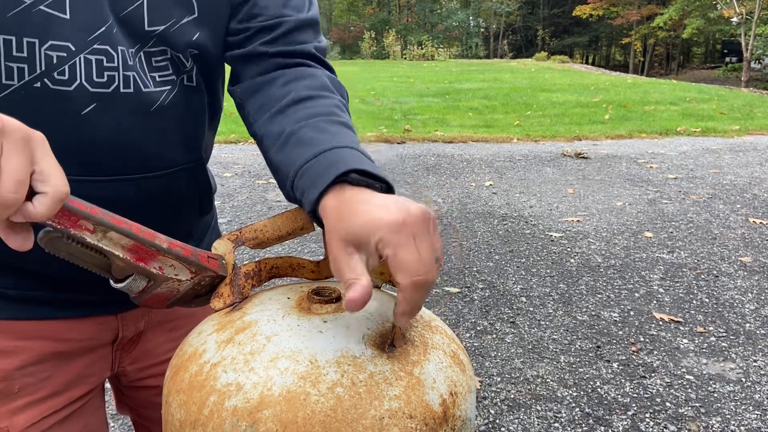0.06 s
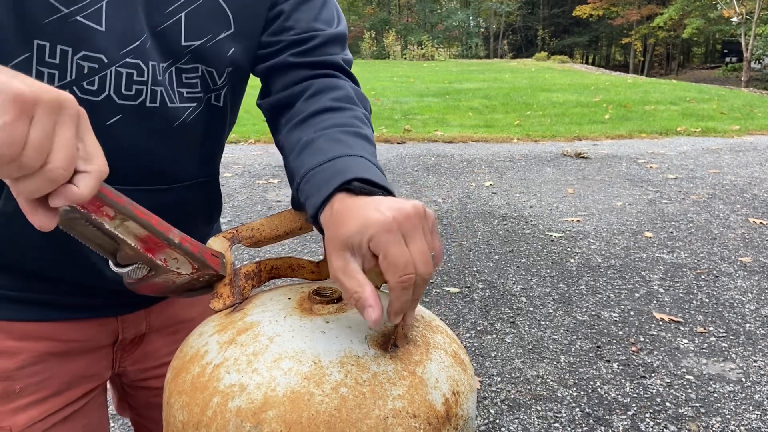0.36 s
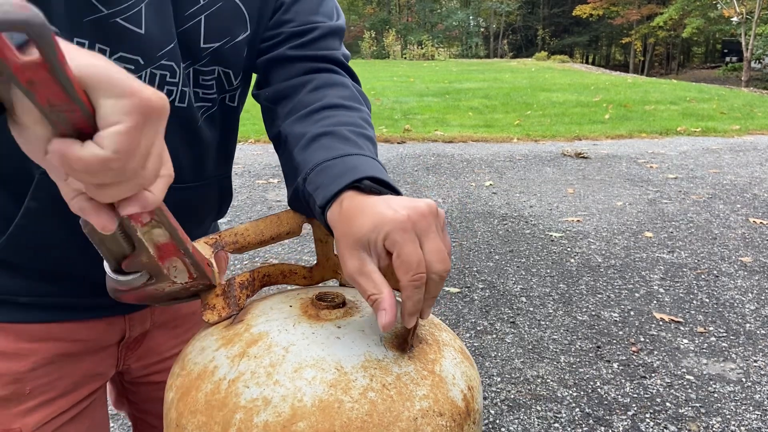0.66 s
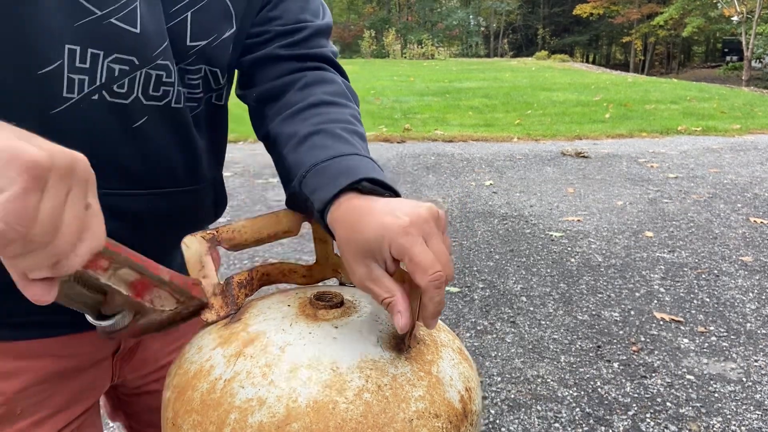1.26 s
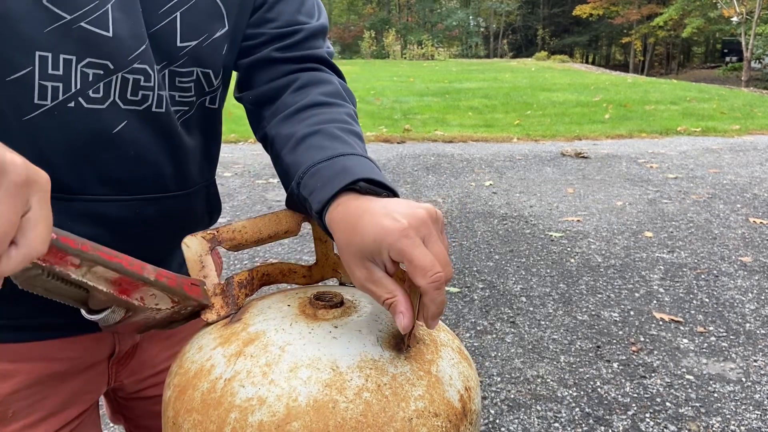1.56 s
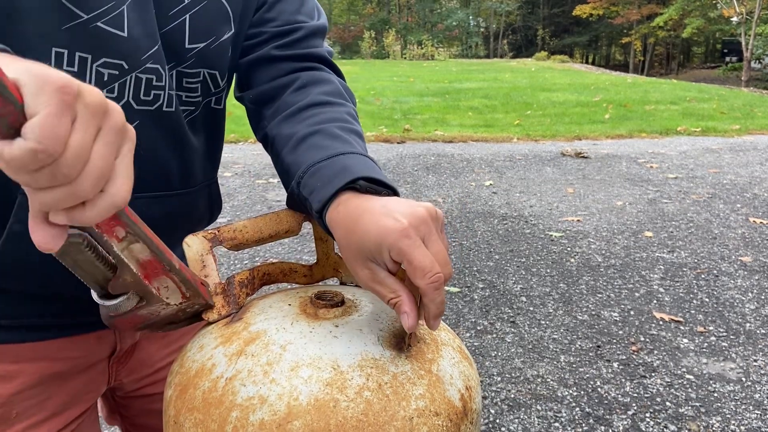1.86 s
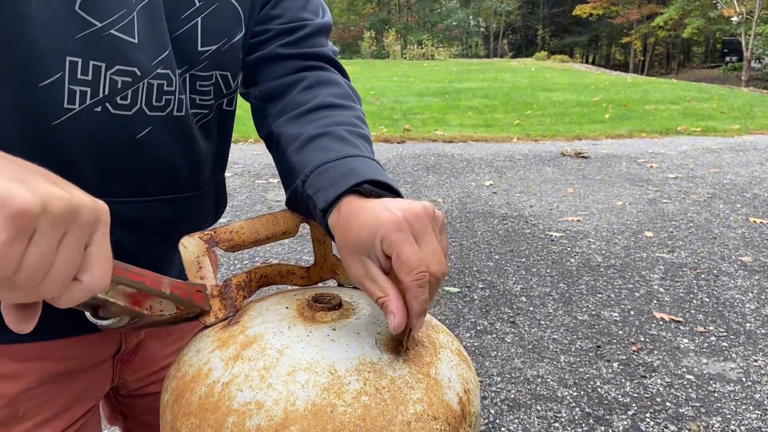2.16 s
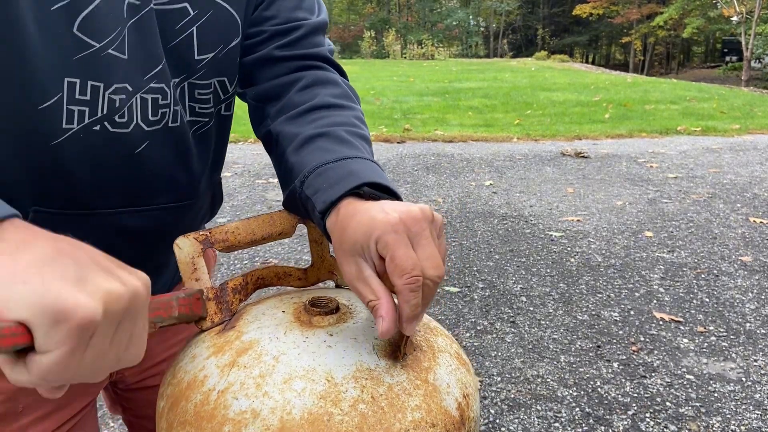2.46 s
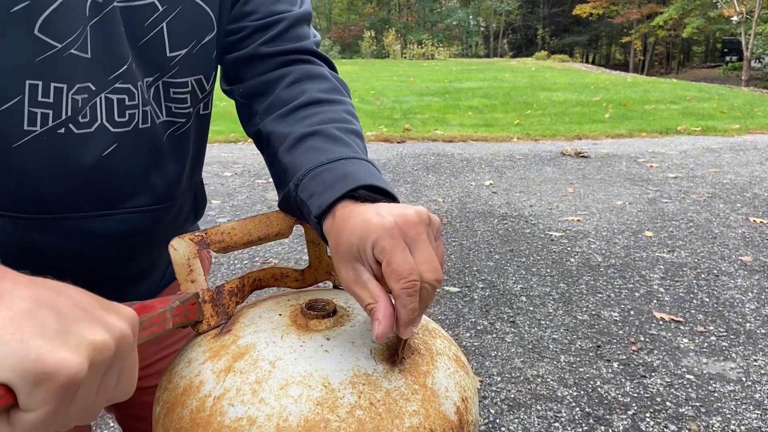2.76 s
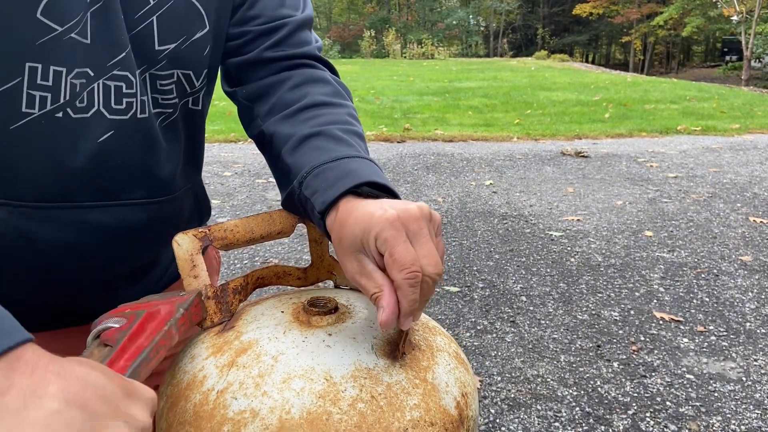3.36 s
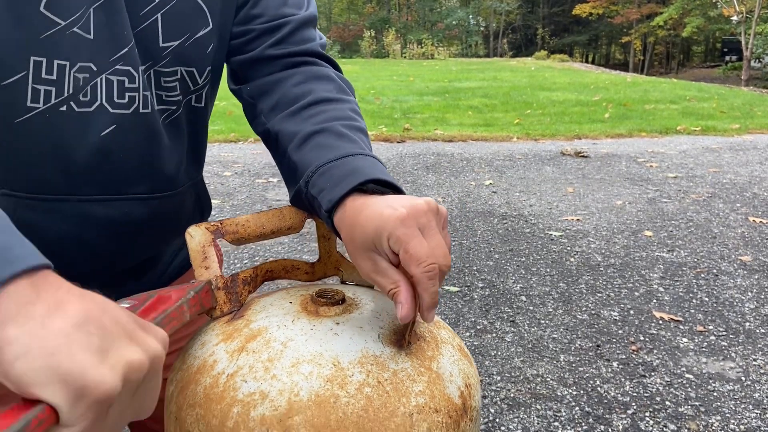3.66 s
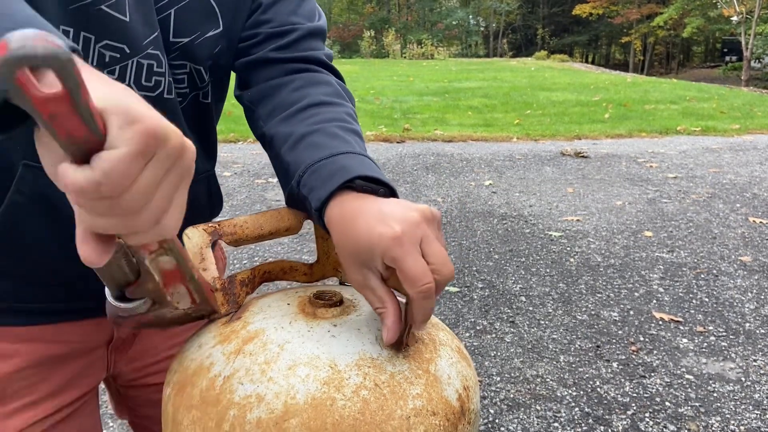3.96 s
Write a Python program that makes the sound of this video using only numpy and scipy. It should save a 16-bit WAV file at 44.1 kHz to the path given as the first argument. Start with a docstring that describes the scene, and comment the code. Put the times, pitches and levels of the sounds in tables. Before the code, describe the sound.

One loud, ringing clang of a tool striking a metal tank, following faint rattles and wind.

```python
"""A steel hand tool on a rusty gas tank, close to a stereo microphone on a quiet driveway.
The tool knocks, rattles and scrapes against the handle, then hits the tank hard: the blow chatters
for a few milliseconds and the shell rings on in beating pairs of modes. Fingers tap, grit clicks and
a sleeve rustles. Wind buffets the microphone, and the recorder's gain ducks under the clang."""
import sys
import numpy as np
from scipy import signal
from scipy.fft import rfft, irfft
from scipy.io import wavfile
from scipy.ndimage import uniform_filter1d, minimum_filter1d

SR = 44100
rng = np.random.default_rng(int(sys.argv[2]) if len(sys.argv) > 2 else 0)


def dump(signal):
    """Clip the signal to [-1, 1] and save it as 16-bit WAV at the path in sys.argv[1]."""
    limited = np.clip(np.atleast_2d(signal).T, -1, 1)
    pcm = np.round(limited * 32767).astype(np.int16)
    wavfile.write(sys.argv[1], SR, pcm)


N = 176400
T = np.arange(N) / SR

# Levels in the tables are relative; each source adds its own gain.
# dense, quickly damped ringing of tool and handle: freq_hz, density_db
CLANK_SPECTRUM = [(60, -9), (330, -28), (520, -1.5), (700, 2), (860, -16), (1130, -20), (1400, 2.5),
                  (2100, -4.5), (2900, 6.5), (3500, -4.5), (4200, -8), (6500, -12.5), (8000, -5.5),
                  (10000, -5), (11500, -9.5), (15000, -16)]
# the many weak upper modes of the shell: freq_hz, density_db
SHIMMER_SPECTRUM = [(200, -13), (600, 5), (950, -19), (1500, -8), (2300, -12), (3600, 2), (5100, -6.5),
                    (6200, -6.5), (8000, -1.5), (10300, -10.5), (12000, -7), (15000, -29)]
# steel catching on rust: freq_hz, density_db
RASP_SPECTRUM = [(100, -46), (450, -10), (720, 11.5), (1000, -4), (1450, 1.5), (1800, -8), (2300, 5),
                 (2900, -2.5), (3600, 0), (4800, -11.5), (7000, -4.5), (9500, -9.5), (11500, -3),
                 (14500, -4.5)]
# stereo width of the close sounds: freq_hz, side_minus_mid_db
CLOSE_WIDTH = [(100, -8), (700, -14), (1400, -14), (2400, -8), (4400, -9), (8500, -13), (15000, -14)]
# stereo width of wind on the microphone: freq_hz, side_minus_mid_db
WIND_WIDTH = [(30, -22), (60, -46), (125, -5.5), (250, -5.5), (1000, -1.5)]


def undb(db):
    """Decibels to gain."""
    return 10 ** (np.asarray(db) / 20)


def gains(points):
    """Gain of each frequency bin from (freq_hz, level_db) points."""
    hz, db = np.array(points, float).T
    bin_hz = np.arange(N // 2 + 1) * SR / N
    return undb(np.interp(np.log(bin_hz + 1), np.log(hz), db))


def noise(spectrum, width_points):
    """Coloured stereo noise of rms 1."""
    mid, side = rfft(rng.standard_normal((2, N)))
    width = gains(width_points)
    stereo = np.array([mid + width * side, mid - width * side]) / np.hypot(1, width)
    y = irfft(gains(spectrum) * stereo, N)
    return y / y.std()


def pan(db):
    """Channel gains, with the left db above the right."""
    return undb(np.array([[db], [-db]]) / 2)


def walk(rate_hz):
    """Smooth random wander of spread 1."""
    span = max(int(SR / rate_hz), 1)
    y = uniform_filter1d(uniform_filter1d(rng.standard_normal(N), span), span)
    return y / y.std()


def fade(t60_s):
    """Exponential decay, 60 dB down after t60_s."""
    return np.exp(-np.minimum(np.log(1000) * T / t60_s, np.log(1e15)))


def dull(x, hz):
    """Gentle low-pass."""
    return signal.sosfilt(signal.butter(2, hz, fs=SR, output="sos"), x + 1e-18)


def at(x, start_s):
    """The sound x, starting at start_s."""
    delay = int(start_s * SR)
    return np.pad(x[:, :N - delay], ((0, 0), (delay, 0)))


def modes(table):
    """Ring of a small part after a sharp contact."""
    return sum(undb(db) * np.sin(2 * np.pi * hz * T) * fade(t60) for hz, db, t60 in table)


def bursts(spectrum, t60_s, count):
    """Short decaying bursts of coloured stereo noise, each one different."""
    size = N // 16
    colour, width = gains(spectrum)[::16], gains(CLOSE_WIDTH)[::16]
    cepstrum = irfft(np.log(colour / np.sqrt(np.mean(colour ** 2))), size)
    cepstrum[1:size // 2] *= 2  # folding makes the filter causal, so attacks stay sharp
    cepstrum[size // 2:] = 0
    response = np.exp(rfft(cepstrum)) / np.hypot(1, width)
    spectra = rfft(rng.standard_normal((count, 2, size)) * fade(t60_s)[:size]) * response
    hits = [irfft(np.array([mid + width * side, mid - width * side]), size) for mid, side in spectra]
    return [np.pad(hit, ((0, 0), (0, N - size))) for hit in hits]


def outdoors(air_db=-51, hum_hz=60, hum_db=-72):
    """Quiet air over the driveway, with a low distant hum."""
    # background air: freq_hz, density_db
    air_spectrum = [(15, -49), (25, -20), (43, -2.5), (62, 1), (107, -9.5), (170, -16), (300, -29.5),
                    (614, -20.5), (1200, -26.5), (4600, -33.5), (5200, -33), (5800, -33), (8000, -37),
                    (10500, -55.5), (13500, -42), (15000, -75)]
    # its stereo width: freq_hz, side_minus_mid_db
    air_width = [(60, -23), (110, -20), (200, -10), (380, 9), (700, 0), (1290, 6), (2380, -4), (4400, -6),
                 (8120, 4.5), (15000, 8)]
    air = undb(air_db + 0.19 * walk(21)) * noise(air_spectrum, air_width)
    return air + undb(hum_db + 2 * walk(12)) * np.sin(2 * np.pi * hum_hz * T)


def wind():
    """Breeze and gusts shake the microphone's ports: rumble, flutter and, in gusts, a hollow throb."""
    # breeze on the microphone: time_s, level_db
    breeze = [(0, -17.5), (1.0, -16.5), (1.1, -9), (1.31, -13), (1.38, -1), (1.5, -1.5), (1.75, -5.5),
              (1.97, -2), (2.1, 1.5), (2.4, -1.5), (2.68, 3.5), (2.77, -5), (2.86, 3.5), (2.96, 0),
              (3.22, 3), (3.52, -2), (3.72, -1), (3.8, -1.5), (4, -5.5)]
    # gusts: peak_s, half_length_s, rumble_db, flutter_db, throb_db
    gusts = [(1.411, 0.029, 3, -5.5, -42), (1.647, 0.033, 1, -0.5, -39.5), (1.789, 0.039, -1.5, -7, -46),
             (1.9, 0.0059, 4.5, -17, -29.5), (2.063, 0.023, -16, 13, -55), (2.2, 0.013, 10, 17, -34.5),
             (2.55, 0.028, 2, -21, -23.5), (2.622, 0.023, 10.5, -6, -26.5), (3.012, 0.0089, 0, 13, -35.5),
             (3.059, 0.012, -3, 3, -44), (3.342, 0.025, 8, 7.5, -33.5)]
    # slow eddies at the ports: freq_hz, density_db
    rumble_spectrum = [(12, -45), (25, -13), (40, -25), (60, 7.5), (110, 1), (180, -5), (300, -16.5),
                       (500, -17.5), (1000, -63), (3000, -103)]
    # quick eddies at the ports: freq_hz, density_db
    flutter_spectrum = [(60, -4.5), (130, -0.5), (190, 1), (290, 0), (450, -7), (700, -13), (1100, -26),
                        (2000, -49), (5000, -76)]
    # hollow throb of a gust: freq_hz, density_db
    throb_spectrum = [(70, -12), (115, -1.5), (185, -0.5), (260, -5.5), (400, -27), (1000, -72),
                      (4000, -100)]
    slow = quick = undb(np.interp(T, *np.array(breeze).T))
    hollow = 0
    for peak_s, half_length_s, rumble_db, flutter_db, throb_db in gusts:
        gust = np.exp(-((T - peak_s) / half_length_s) ** 2)
        slow = slow + undb(rumble_db) * gust
        quick = quick + undb(flutter_db) * gust
        hollow = hollow + undb(throb_db) * gust
    rumble = slow * undb(-36.5 + 3 * np.tanh(walk(40))) * noise(rumble_spectrum, WIND_WIDTH)
    flutter = quick * undb(-46 + 9 * np.tanh(walk(63))) * noise(flutter_spectrum, WIND_WIDTH)
    return pan(db=-2) * (rumble + flutter + hollow * eddies(throb_spectrum))


def eddies(spectrum, smooth_s=.04):
    """Turbulence of even strength, so that the gusts alone set its swell."""
    turbulence = noise(spectrum, WIND_WIDTH)
    power = uniform_filter1d(np.mean(turbulence ** 2, axis=0), int(smooth_s * SR))
    return turbulence / np.sqrt(power + 1e-9)


def sleeve():
    """Cloth brushes as the arm moves."""
    # swell of the rustle: time_s, level_db
    swell = [(0, -71), (.35, -77), (.45, -65.5), (.6, -73.5), (.85, -65.5), (1.1, -75), (1.4, -59.5),
             (1.7, -58.5), (1.95, -63), (2.3, -65), (2.45, -101), (4, -62.5)]
    # rubbing cloth: freq_hz, density_db
    cloth_spectrum = [(500, -9), (1800, 8.5), (3500, 3), (6500, 1), (9500, -0.5), (12000, 5.5), (14000, -3),
                      (15000, -16)]
    return undb(np.interp(T, *np.array(swell).T) + 1.7 * walk(40)) * noise(cloth_spectrum, CLOSE_WIDTH)


def finger_taps():
    """Fingers shift their hold with soft, dull taps."""
    # hands settling on the tank: start_s, level_db
    taps = [(0.249, -48), (0.435, -50), (0.863, -55), (1.053, -46), (1.326, -49)]
    # one tap: freq_hz, density_db
    tap_spectrum = [(100, -20), (400, -9), (650, 6), (950, -6.5), (1600, -26), (4000, -35), (10000, -53)]
    hits = bursts(tap_spectrum, t60_s=0.053, count=len(taps))
    return sum(undb(db) * at(hit, start_s) for hit, (start_s, db) in zip(hits, taps))


def knocks(ring):
    """The tool knocks lightly: a crack, a clink of the handle and a faint ring of the shell."""
    # tool on handle: start_s, level_db, lowpass_hz, ring_db
    contacts = [(1.1047, -29.5, 1920, -11), (1.1150, -22.5, 1640, -5), (1.1233, -18, 2670, -10),
                (1.221, -30, 7840, 9), (1.636, -27.5, 2500, -4), (1.7508, -30, 2960, -2),
                (1.9277, -35, 4100, 2), (2.1, -28, 3000, -5), (2.919, -39.5, 4000, -15),
                (3.687, -36, 4000, -4), (3.734, -40.5, 6000, 0)]
    # short modes of the welded handle: pitch_hz, level_db, t60_s
    handle_modes = [(803, -14, 0.12), (1436, -1, 0.054), (2090, -16, 0.35), (2930, -16, .04),
                    (3620, -8, .08)]
    clink = undb(-15) * modes(handle_modes)
    cracks = bursts(CLANK_SPECTRUM, t60_s=0.034, count=len(contacts))
    out = 0
    for crack, (start_s, db, lowpass_hz, ring_db) in zip(cracks, contacts):
        knock = undb(-11.5) * crack + clink + undb(ring_db) * ring
        out = out + undb(db) * dull(at(knock, start_s), lowpass_hz)
    return out


def shell(decay_stretch=1.14):
    """The tank's ring when struck and when touched on the handle: beating mode pairs over a shimmer."""
    # twin modes of the shell; handle_db is the change when only the handle is touched:
    # pitch_hz, level_db, unstretched_t60_s, split_hz, twin_db, pan_db, handle_db
    shell_modes = [(560, -27, 2.6, 2, -18, 2, -22), (725, -35, .12, 35, -8, 1, -10),
                   (1129, -33, 1.0, 3, -16, 3, -19), (1394, -25.5, .6, 30, -10, 0, -4),
                   (1663, -42, .4, 14, -8, 0, -8), (1763, -38, 1.0, 5, -12, 0, -12),
                   (1858, -23.5, .5, 17, -6, 1, -8), (2120, -34, .7, 6, -12, -2, -16),
                   (2216, -26, .2, 45, -3, -1, -10), (2447, -22.5, .8, 6, -6, -1, -24),
                   (2562, -39, .8, 8, -10, -1, -14), (2746, -23.5, .5, -18, -5, -3, -9),
                   (2800, -33, .5, 7, -12, -2, -12), (2883, -25, .36, 26, -5, -2, -6),
                   (2935, -19, .08, 75, -4, -2, -22), (3155, -38, .35, -60, -2, 0, -10),
                   (3240, -29, .36, 6, -10, 0, 2), (3390, -17, .15, 12, -14, 1, -16),
                   (3548, -35, .2, 20, -8, 0, -6), (3709, -46, .4, 9, -10, 0, 14),
                   (3817, -38, .3, 129, -1, 0, -12), (4011, -26.5, .36, 32, -3, 0, -18),
                   (4161, -38, .35, 11, -10, 0, -12), (4253, -39, .5, 55, -3, 0, 0),
                   (4366, -46, .35, 12, -10, 0, 18), (4748, -33, .38, -16, -6, -1, -17),
                   (4953, -27, .2, 69, -1, -1, -19), (5109, -39, .45, 102, -4, 0, -12),
                   (5497, -33, .27, 91, -3, 0, -14), (6950, -41, .45, 40, -5, 0, 4)]
    struck = touched = 0
    for hz, db, t60, split_hz, twin_db, pan_db, handle_db in shell_modes:
        pair = np.sin(2 * np.pi * hz * T) + undb(twin_db) * np.sin(2 * np.pi * (hz + split_hz) * T)
        mode = undb(db - 3.2) * pan(pan_db) * pair * fade(t60 * decay_stretch)
        struck = struck + mode
        touched = touched + undb(handle_db) * mode
    dense = noise(SHIMMER_SPECTRUM, CLOSE_WIDTH)
    low = dull(dense, hz=5040)
    wash = low * fade(t60_s=.33) + (dense - low) * fade(t60_s=.26)
    shimmer = undb(-27.5) * wash + overtones(count=100)
    return struck + shimmer, touched + shimmer


def overtones(count, low_hz=3800, high_hz=13000, mean_t60_s=0.23):
    """Scattered upper modes of the shell, each with its own strength and decay."""
    t = T[:N // 4]
    colour = gains(SHIMMER_SPECTRUM)
    out = 0
    for k, (place, strength, life, lag) in enumerate(rng.random((count, 4))):
        hz = low_hz * (high_hz / low_hz) ** ((k + place) / count)
        tone = np.sin(2 * np.pi * hz * t + np.array([[0], [2 * lag - 1]]))
        decay = fade(mean_t60_s * (.5 + life))[:len(t)]
        out = out + strength * colour[int(hz * N / SR)] * tone * decay
    return undb(-33) * np.pad(out, ((0, 0), (0, N - len(t))))


def jaw_rattle():
    """The tool's loose jaw skips over the rust, brighter towards the end of the slip."""
    # skips along the handle: start_s, level_db, lowpass_hz
    skips = [(1.1723, -31, 3500), (1.185, -23, 2800), (1.1967, -18, 2800), (1.2015, -20, 3480),
             (1.2133, -25, 9000), (1.2185, -24, 13000)]
    # short modes of the jaw: pitch_hz, level_db, t60_s
    jaw_modes = [(674, -2, 0.046), (804, -4.5, 0.038), (2280, 2, 0.052), (2340, -8, 0.032),
                 (3640, 1.5, 0.048)]
    jaw = undb(-17) * modes(jaw_modes)
    rasps = bursts(RASP_SPECTRUM, t60_s=0.019, count=len(skips))
    return sum(undb(db) * dull(at(undb(-12) * rasp + jaw, start_s), lowpass_hz)
               for rasp, (start_s, db, lowpass_hz) in zip(rasps, skips))


def scrapes(ring, catches_per_s=1800):
    """Dense uneven catches of steel on rust drive tool and shell."""
    # steel sliding on rust: peak_s, rise_s, fall_s, level_db, lowpass_hz
    slides = [(1.2, 0.02, 0.029, -15, 3200), (1.22, 0.027, 0.013, -21.5, 12900),
              (1.604, 0.0091, 0.027, -22.5, 7250), (3.775, 0.018, 0.11, -19.5, 12800),
              (3.79, 0.0037, 0.0011, -1.5, 5100)]
    catches = (rng.random(N) < catches_per_s / SR) * rng.standard_normal(N) * undb(-11.5)
    force = 0
    for peak_s, rise_s, fall_s, db, lowpass_hz in slides:
        from_peak = np.maximum((peak_s - T) / rise_s, (T - peak_s) / fall_s)
        swell = np.exp(-np.minimum(from_peak, 20))
        force = force + undb(db) * dull(catches * swell, lowpass_hz)
    rasp = bursts(RASP_SPECTRUM, t60_s=0.022, count=1)[0]
    body = undb(-10.5) * rasp + undb(-17) * ring
    return signal.fftconvolve(force[None], body, axes=1)[:, :N]


def wind_pops():
    """Small eddies burst on the microphone's ports, some as thuds, some as crackles."""
    # pops of wind: start_s, level_db, lowpass_hz
    pops = [(1.977, -33, 700), (2.046, -32, 900), (2.084, -42, 700), (2.108, -35.5, 1800),
            (2.196, -31, 700), (2.211, -29, 1100), (2.232, -32, 905), (2.253, -38.5, 1530),
            (2.27, -26, 1500), (2.348, -35.5, 1100), (2.398, -37.5, 900), (2.559, -44, 500),
            (2.617, -37.5, 550), (2.641, -39, 547), (2.679, -30, 650), (2.69, -28.5, 1800),
            (2.819, -30, 815), (2.842, -30.5, 765), (2.865, -29.5, 900), (2.998, -25.5, 810),
            (3.056, -28, 1000), (3.118, -33.5, 1200), (3.211, -25.5, 590), (3.239, -31.5, 736),
            (3.434, -30.5, 780), (3.612, -35, 800)]
    # one pop: freq_hz, density_db
    pop_spectrum = [(60, 0.5), (200, -3), (450, 1.5), (650, 2.5), (1000, -8), (1600, -19), (4000, -44),
                    (10000, -68)]
    hits = bursts(pop_spectrum, t60_s=0.017, count=len(pops))
    return pan(db=-2) * sum(undb(db) * dull(at(hit, start_s), lowpass_hz)
                            for hit, (start_s, db, lowpass_hz) in zip(hits, pops))


def grit():
    """Grit clicks under the grip."""
    # tiny sharp ticks: start_s, level_db
    ticks = [(2.3085, -52), (2.34, -46), (3.302, -50), (3.316, -46.5), (3.399, -44)]
    # one tick: freq_hz, density_db
    tick_spectrum = [(1000, -7), (4000, -2.5), (9000, 0.5), (15000, -2.5)]
    hits = bursts(tick_spectrum, t60_s=0.022, count=len(ticks))
    return sum(undb(db) * at(hit, start_s) for hit, (start_s, db) in zip(hits, ticks))


def blow(ring):
    """The tool lands hard, chatters and sets the shell ringing."""
    # contacts of the chattering tool: start_s, level_db
    contacts = [(3.7940, -2.5), (3.7953, 7.5), (3.7977, 8), (3.8000, -0.5), (3.8068, 1.5)]
    hits = bursts(CLANK_SPECTRUM, t60_s=0.025, count=len(contacts))
    chatter = sum(undb(db - 9.5) * at(hit, start_s) for hit, (start_s, db) in zip(hits, contacts))
    return undb(-3.5) * (chatter + undb(2.5) * at(ring, start_s=contacts[0][0]))


def ports(x):
    """The treble of close sounds reaches the microphone's two ports out of step."""
    # phase lead of the left port: freq_hz, lead_rad
    port_phase = [(4400, 0), (6500, .5), (7500, 1.8), (9100, 3.14), (10500, 4.7), (12300, 6.28),
                  (14000, 7.6), (15200, 9.4)]
    lead = np.interp(np.arange(N // 2 + 1) * SR / N, *np.array(port_phase).T)
    return irfft(rfft(x) * np.exp(.5j * lead * np.array([[1], [-1]])), N)


def scene():
    """Tool and tank close to the microphone, in the open air."""
    struck, touched = shell()
    metal = blow(struck) + knocks(touched) + jaw_rattle() + scrapes(touched)
    handling = grit() + finger_taps() + sleeve()
    return ports(metal + handling) + wind() + wind_pops() + outdoors()


def record(dry, threshold_db=-2.5, slope=0.48, hold_s=0.13, release_s=0.012, top_hz=15400):
    """The recorder's gain ducks on a peak, holds and recovers; the top is cut."""
    hold = int(hold_s * SR) // 2 * 2 + 1
    held_peak = -minimum_filter1d(-abs(dry).max(axis=0), hold, origin=hold // 2)
    excess = np.log(np.maximum(held_peak / undb(threshold_db), 1))
    step = 1 / (release_s * SR)
    duck = np.maximum(excess, signal.lfilter([step], [1, step - 1], excess))
    ducked = dry * np.exp(-slope * uniform_filter1d(duck, size=64))
    return signal.sosfilt(signal.ellip(8, .2, 70, top_hz, fs=SR, output="sos"), ducked)


dry = scene()
out = record(dry)
dump(out)
```